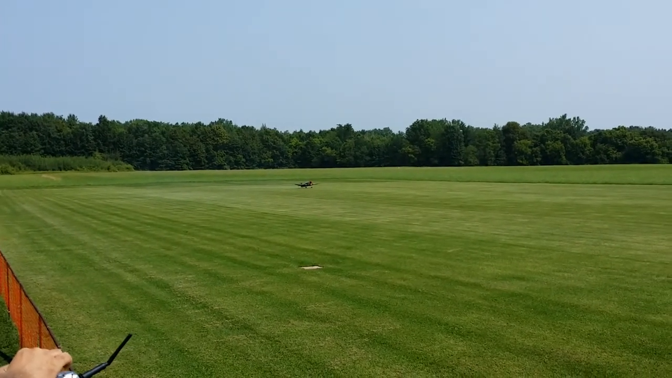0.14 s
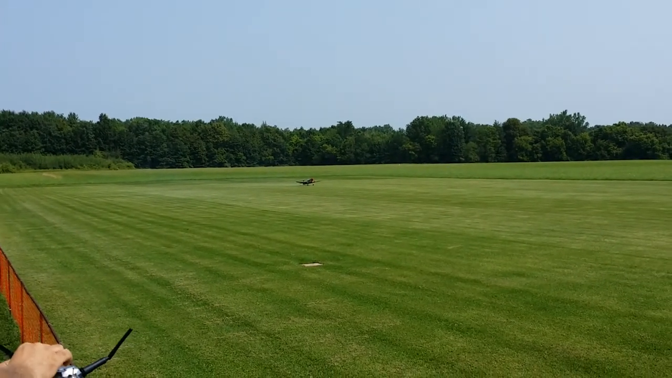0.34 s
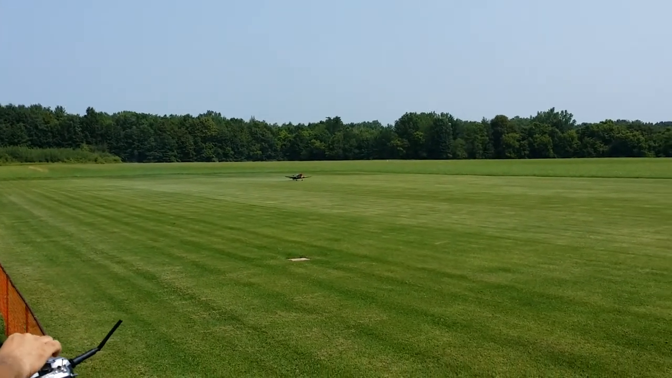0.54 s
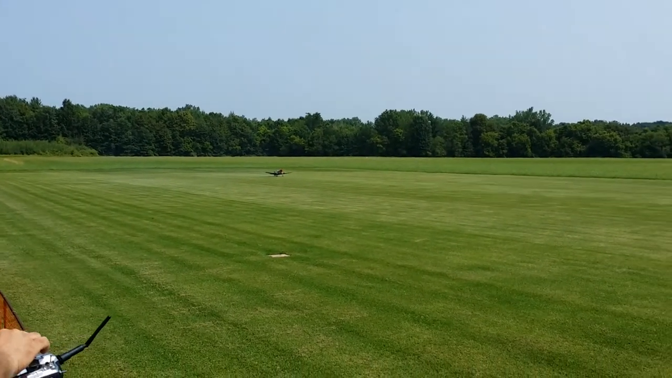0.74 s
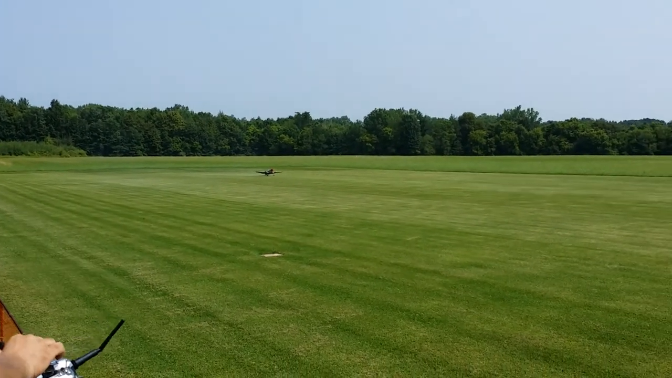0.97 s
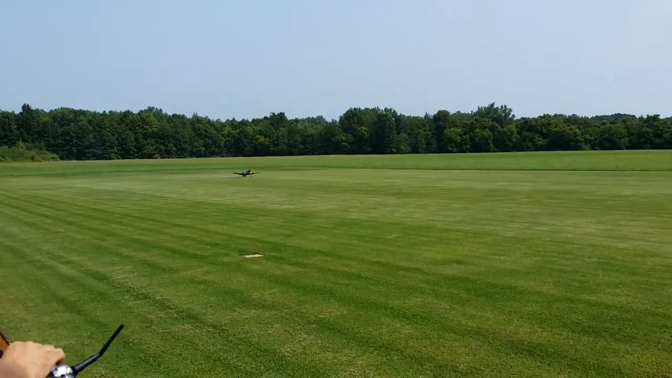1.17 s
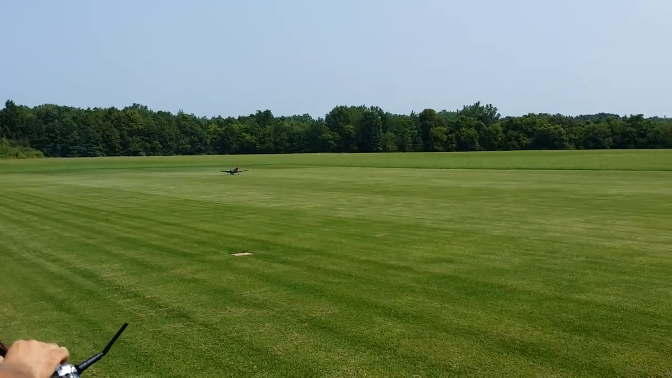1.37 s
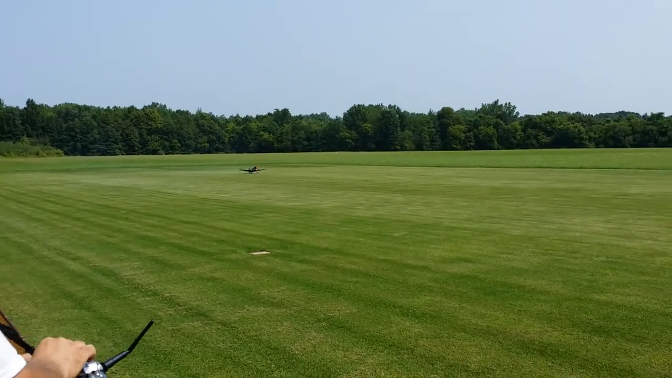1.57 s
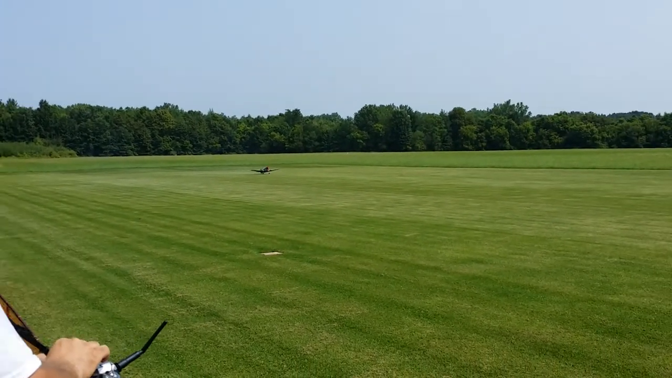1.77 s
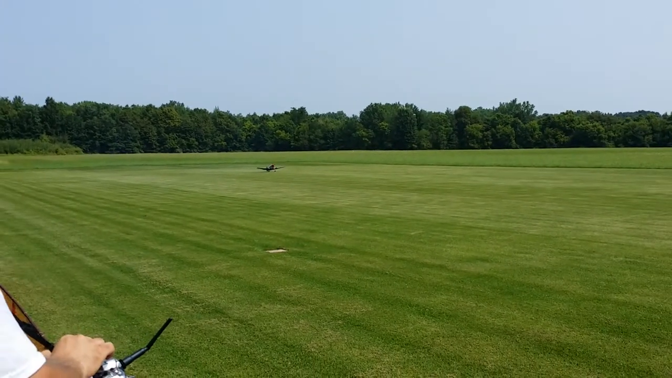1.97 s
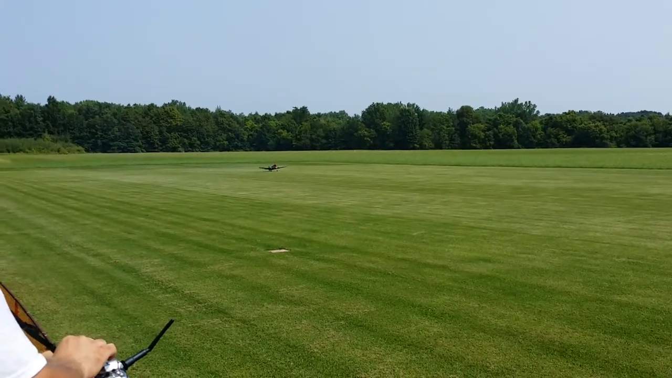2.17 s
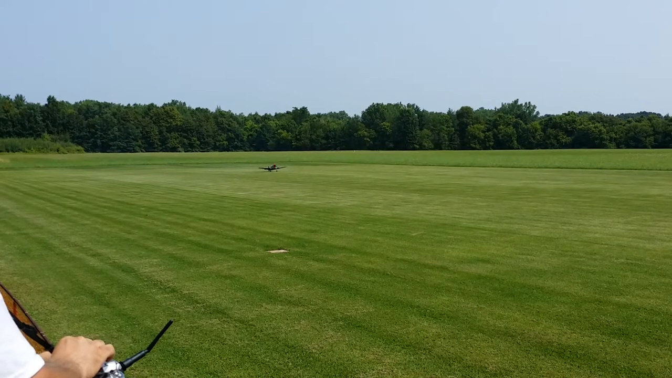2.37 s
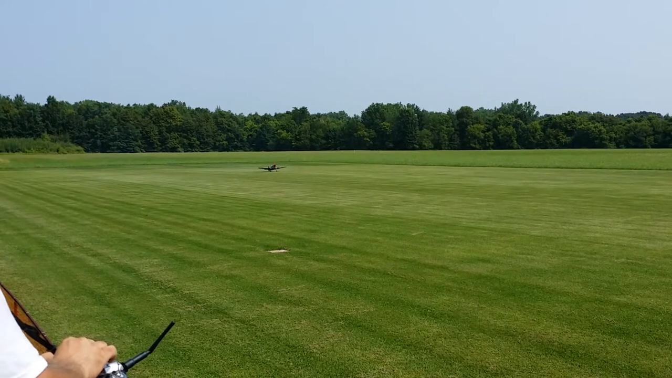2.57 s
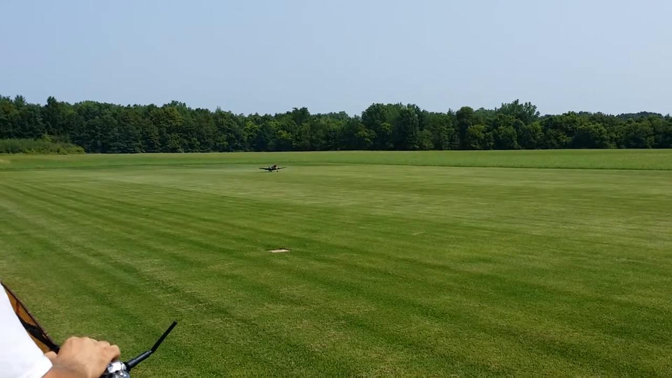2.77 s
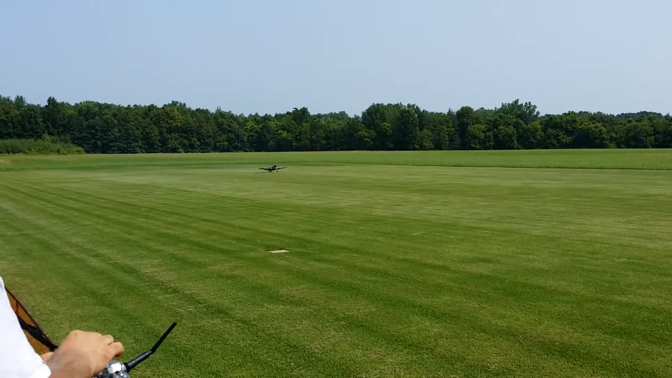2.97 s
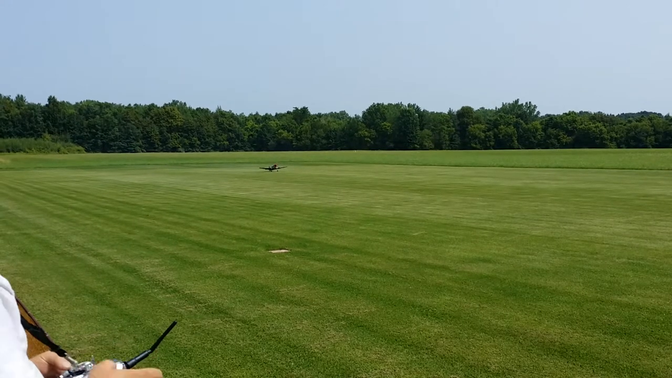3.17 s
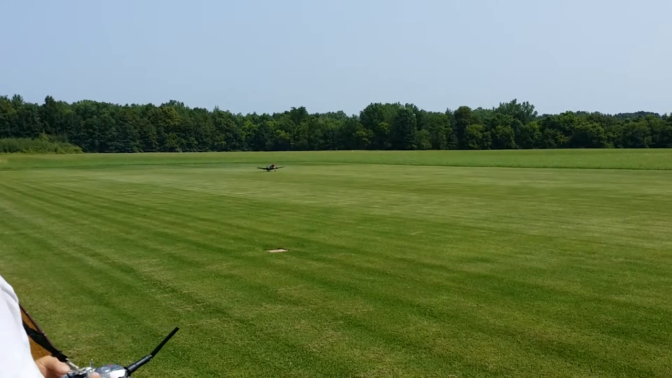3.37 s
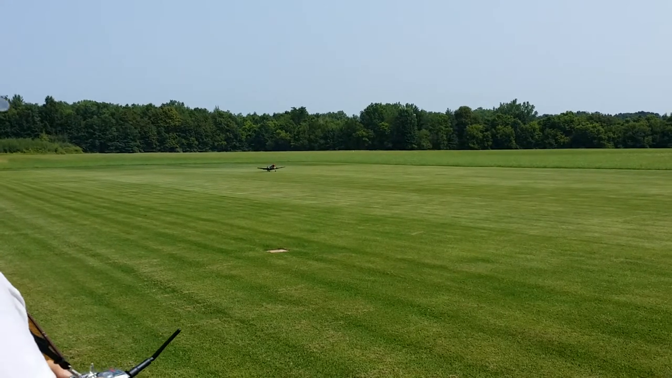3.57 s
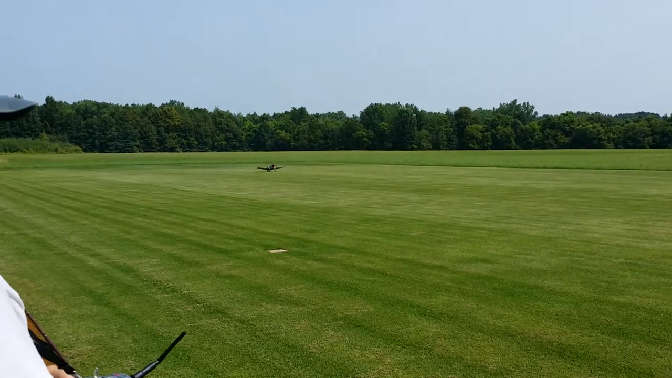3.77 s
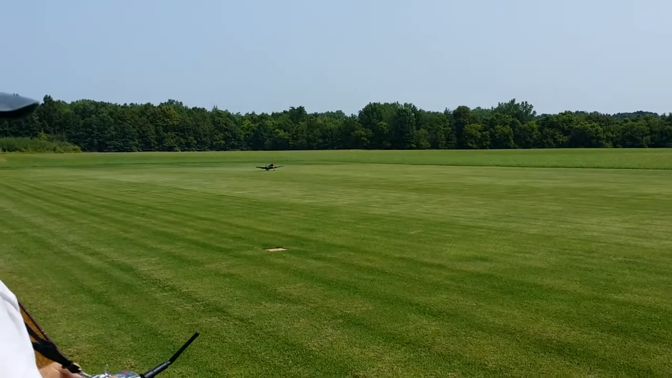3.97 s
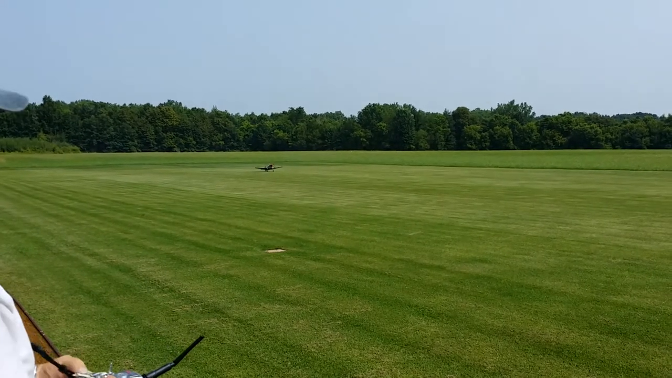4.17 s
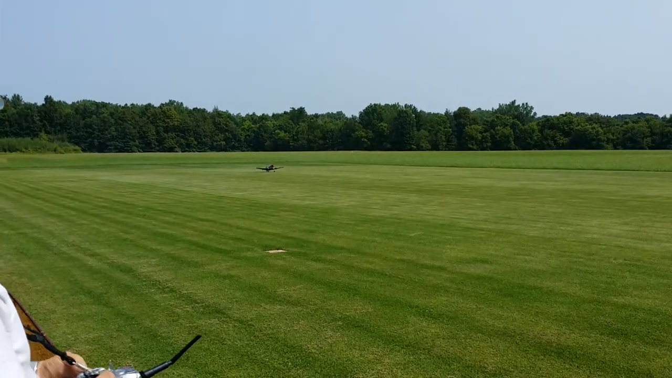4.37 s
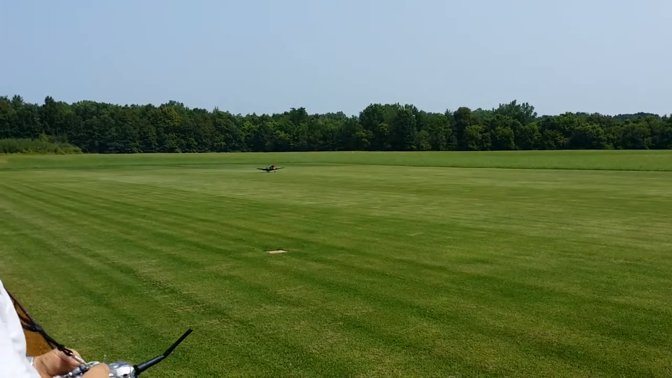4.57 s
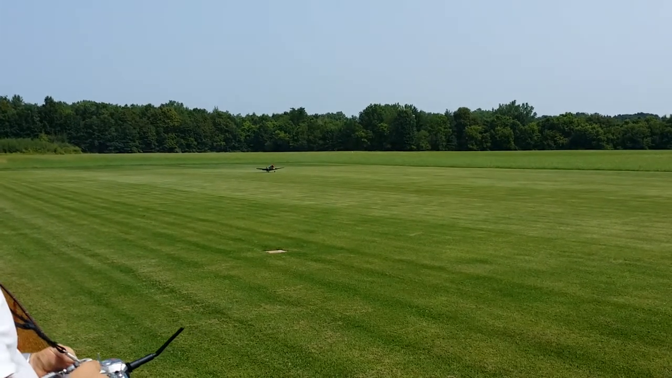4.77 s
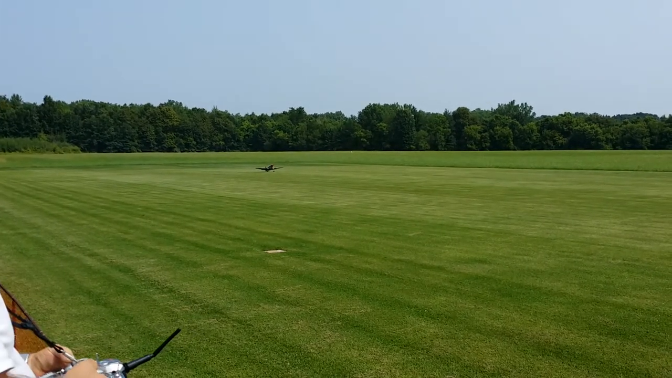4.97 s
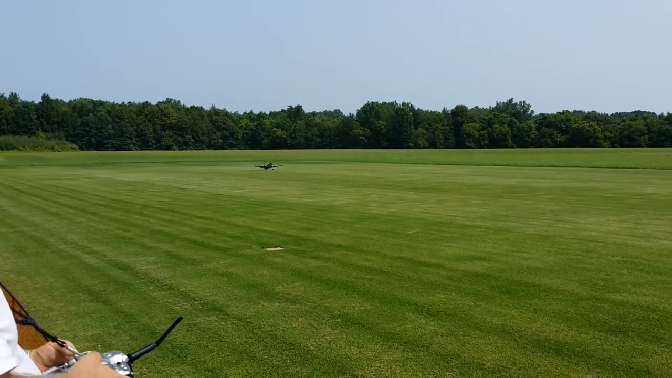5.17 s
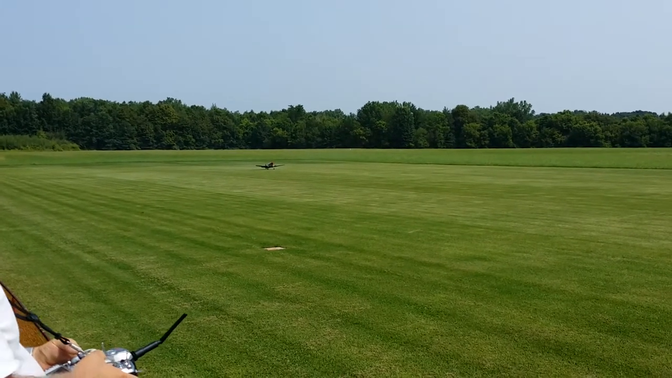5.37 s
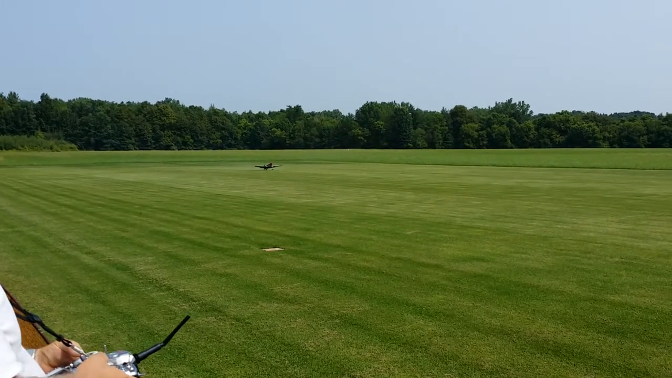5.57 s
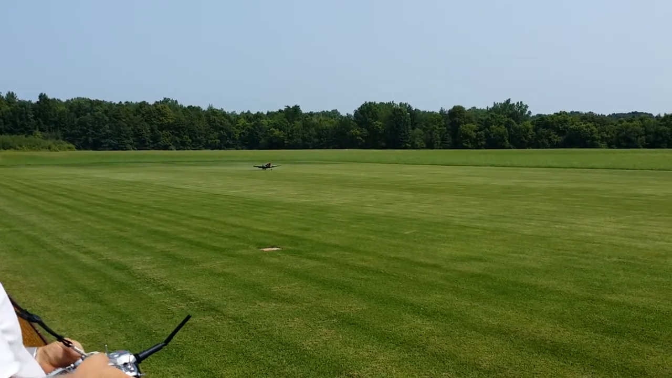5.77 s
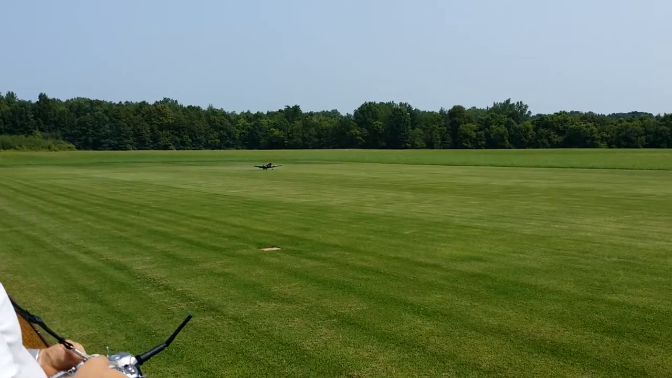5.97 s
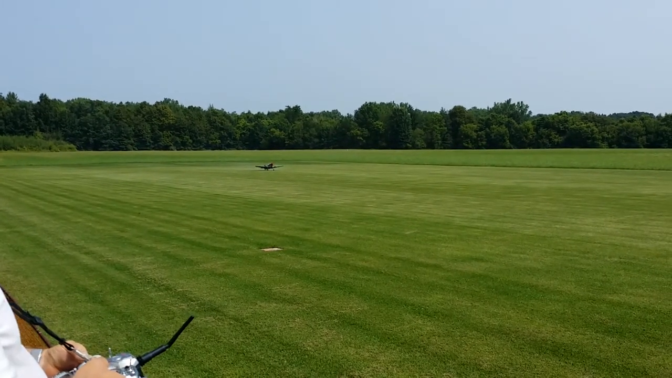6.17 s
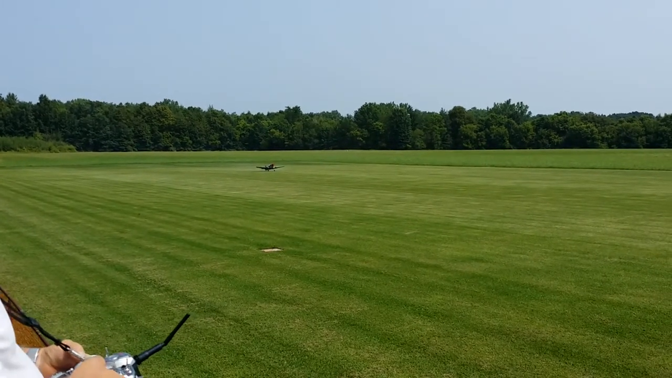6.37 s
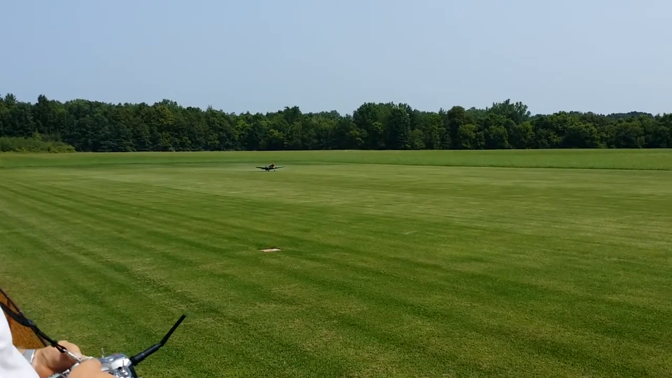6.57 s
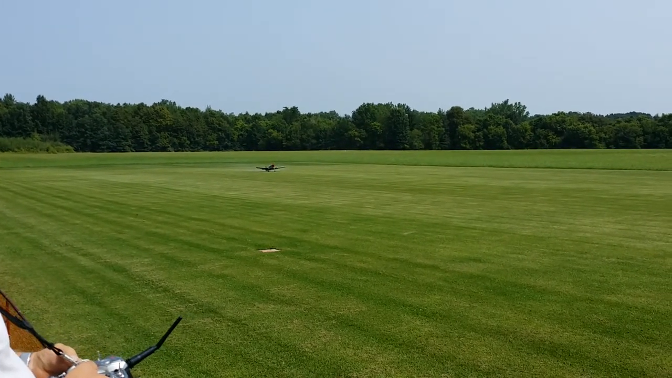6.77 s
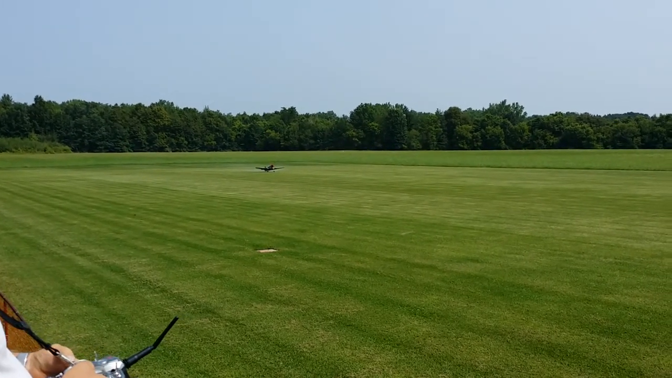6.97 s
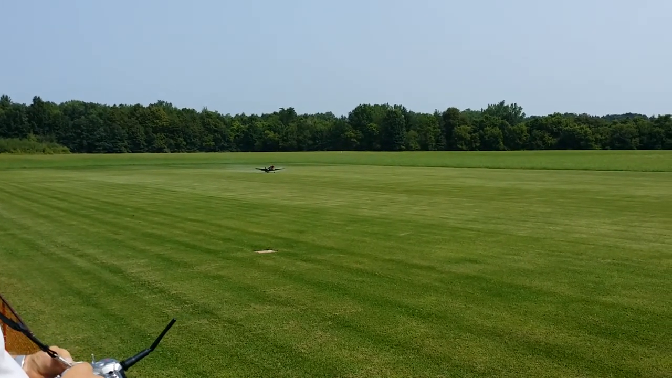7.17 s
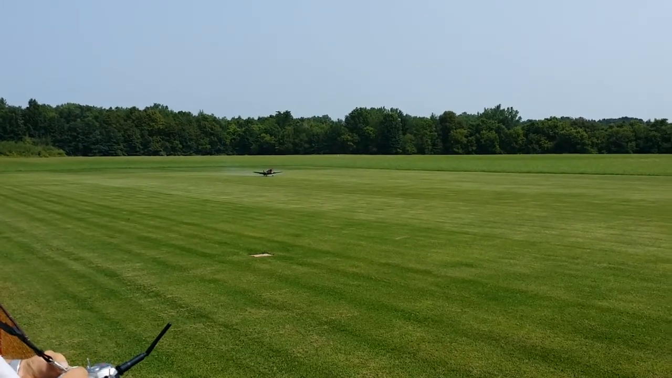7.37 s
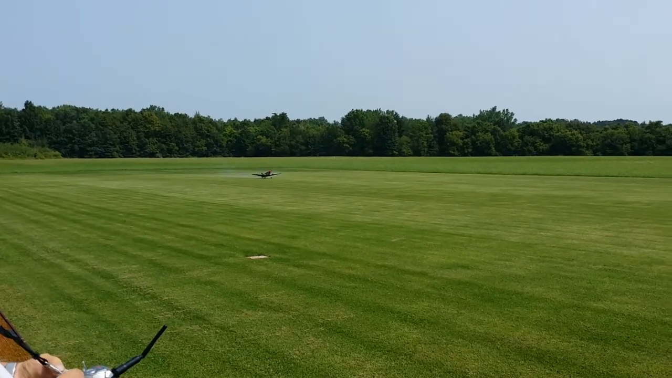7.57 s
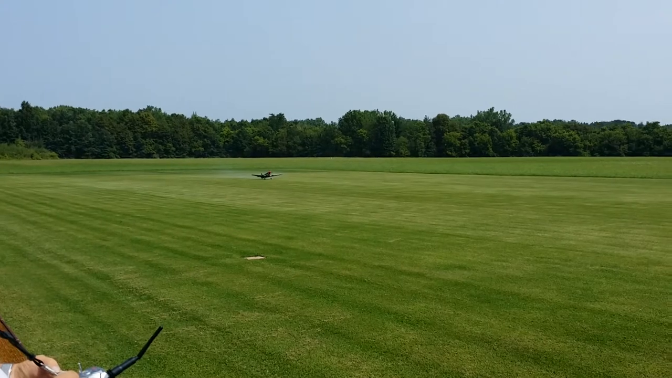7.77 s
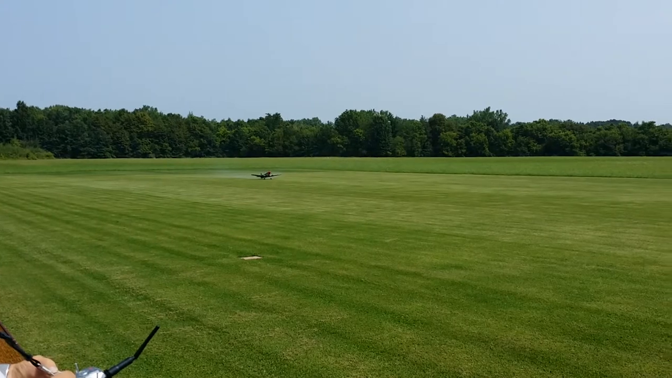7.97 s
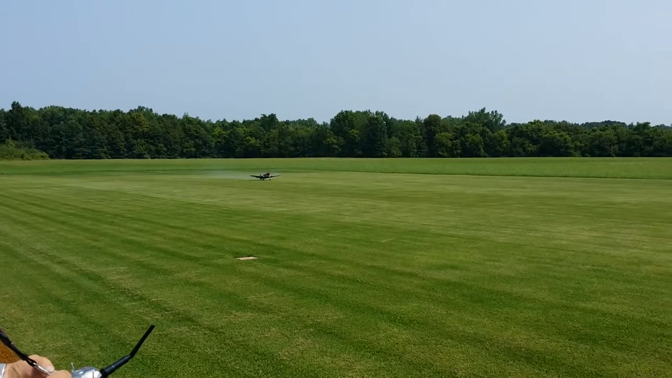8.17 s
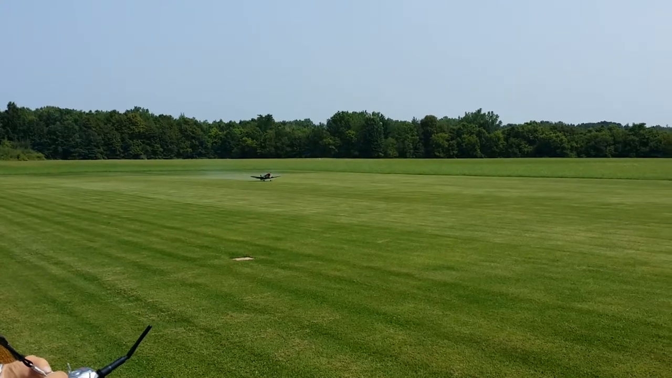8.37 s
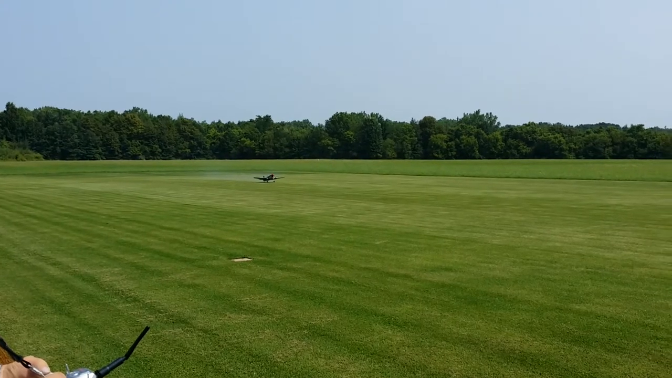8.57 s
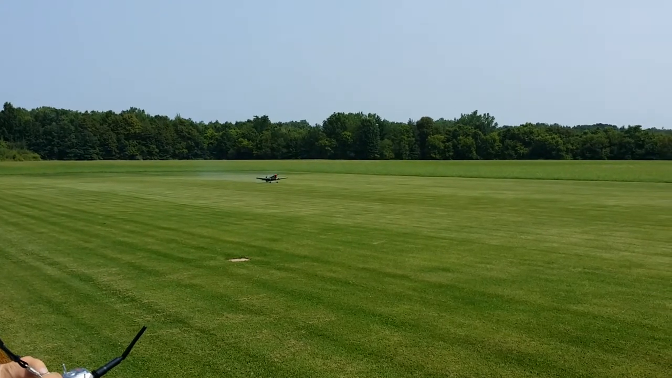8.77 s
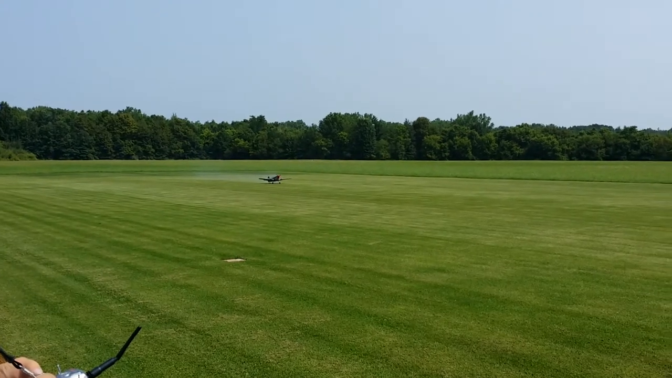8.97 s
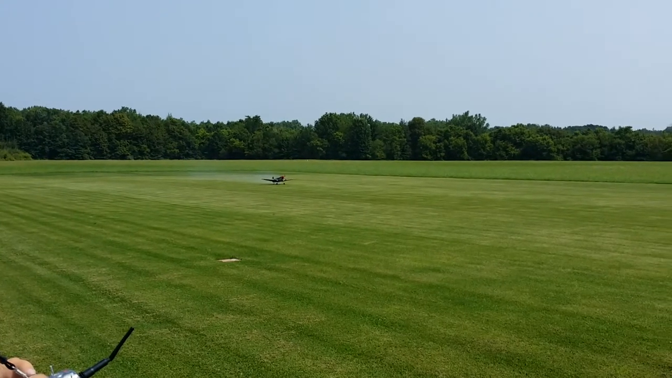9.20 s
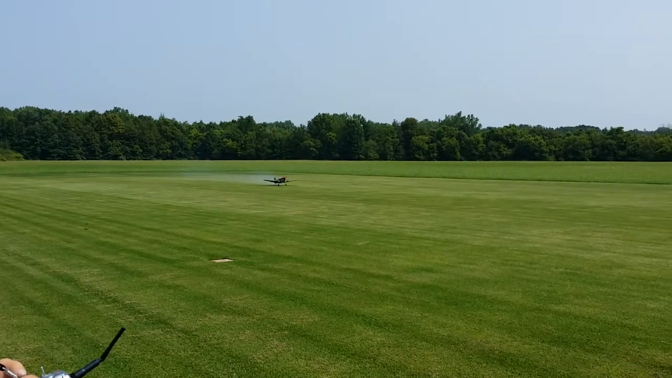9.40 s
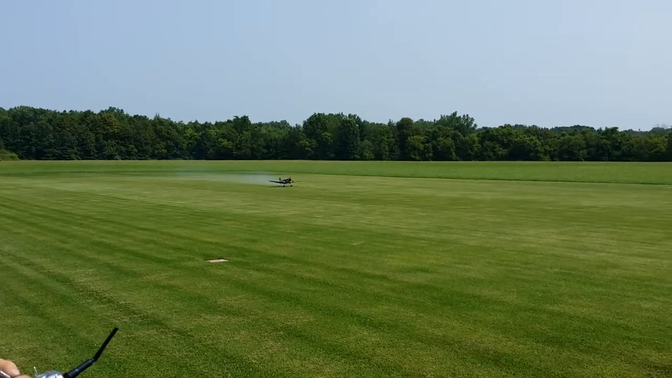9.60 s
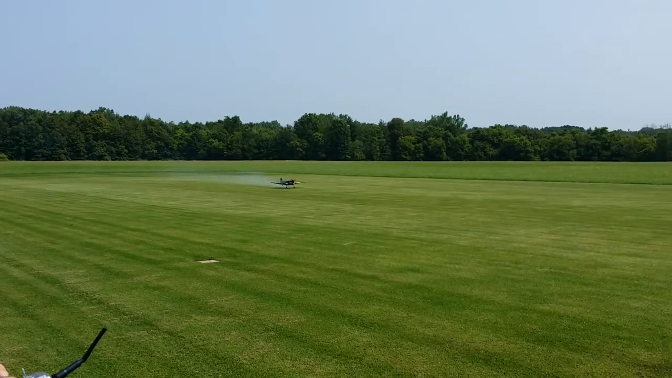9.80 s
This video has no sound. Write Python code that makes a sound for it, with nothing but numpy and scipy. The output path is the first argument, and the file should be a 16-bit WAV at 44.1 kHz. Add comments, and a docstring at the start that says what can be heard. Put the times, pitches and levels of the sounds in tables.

```python
"""A model airplane's single-cylinder four-stroke engine idles, drops lower, then opens up as the plane rolls over
a mown field. Every firing sends a puff through the muffler, built as firing orders and filtered sharp fronts,
and knocks the metal crankcase; valve gear ticks between firings. Blows and gas are noise shaped by each cycle.
The two-blade propeller hums louder with speed, in the lowest orders. Light wind and a quiet field lie underneath."""
import sys
import numpy as np
from scipy import signal
from scipy.fft import rfft, irfft, next_fast_len
from scipy.io import wavfile
from scipy.ndimage import uniform_filter1d, map_coordinates

SR = 44100
rng = np.random.default_rng(int(sys.argv[2]) if len(sys.argv) > 2 else 0)


def put_to_file(sound):
    """Save the sound as 16-bit audio at rate SR, in the file named by the first command-line argument."""
    columns = np.atleast_2d(sound).T  # one column per channel
    safe = np.clip(columns, -1, 1)
    whole_steps = np.round(safe * 32767)
    wavfile.write(sys.argv[1], SR, whole_steps.astype(np.int16))


N = 433944
TIME = np.arange(N) / SR  # s
CRUISE_RATE = 30  # firings a second, the reference for every speed law


def amp(db):
    """Decibels to gain."""
    return 10 ** (np.asarray(db) / 20)


def unit(x):
    """Scale to rms 1."""
    return x / np.sqrt(np.mean(x ** 2) + 1e-20)


def steady(x):
    """Even out slow changes of level, holding the rms near 1 over about a third of a second."""
    power = uniform_filter1d(uniform_filter1d(x ** 2, size=SR // 3), size=SR // 8)
    return x / np.sqrt(np.abs(power) + 1e-20)


def along(points, hz):
    """Read (Hz, value) points on a log frequency axis."""
    f, v = np.transpose(points)
    return np.interp(np.log(hz + 1), np.log(f), v)


def curves(rows):
    """One value per sample for each column after the time."""
    s, *cols = np.transpose(rows)
    return [np.interp(TIME, s, c) for c in cols]


def bump(when, length, height):
    """A smooth bell over time, such as a brief change of level in dB."""
    return height * np.exp(-((TIME - when) / length) ** 2)


def wobble(rate):
    """A smooth random curve, rate knots a second."""
    knots = rng.standard_normal(int(N * rate / SR) + 4)
    return map_coordinates(knots, [TIME * rate])


def octaves(rate):
    """Engine speed in octaves above cruise."""
    return np.log2(rate / CRUISE_RATE)


def filtered(x, response):
    """Multiply the spectrum of x by a response of frequency."""
    size = next_fast_len(N + SR // 4)
    hz = np.fft.rfftfreq(size, 1 / SR)
    return irfft(rfft(x, size) * response(hz), size)[..., :N]


def causal(spectrum, modes=(), size=8192):
    """Frequencies and minimum-phase response of a body with a broad spectrum and sharp resonances."""
    hz = np.fft.rfftfreq(size, 1 / SR)
    level = along(spectrum, hz)
    level = level + sum(db / (1 + (2 * (hz - f) / width) ** 2) for f, width, db in modes)
    # folding the cepstrum forward puts the ringing after the blow
    cepstrum = irfft(np.log(amp(level)))
    cepstrum[1:size // 2] *= 2
    cepstrum[size // 2 + 1:] = 0
    return hz, np.exp(rfft(cepstrum))


def pulses(times, sizes):
    """Impulses at the given times."""
    index = np.clip(np.round(times * SR).astype(int), 0, N)
    return np.bincount(index, sizes, N + 1)[:N]


def moments(cycle, offset):
    """The times at which the engine passes a point of its cycle."""
    return np.interp(np.arange(int(cycle[-1]) + 1) + offset, cycle, TIME, right=TIME[-1] + 1)


def engine():
    """The firing rate drives exhaust, propeller and clatter together."""
    # Engine speed. Each row: time in seconds, firings a second.
    firing = [(0.0, 30.63), (0.4, 30.72), (0.78, 30.81), (1.09, 31.79), (1.41, 26.45), (1.81, 23.65),
              (3.12, 24.42), (3.46, 24.2), (3.7, 24.93), (3.8, 28.33), (4.05, 29.97), (4.28, 31.73),
              (4.55, 31.52), (4.82, 31.14), (5.09, 33.57), (5.5, 33.77), (6.12, 34.28), (6.3, 35.99),
              (6.54, 36.65), (6.75, 38.95), (7.0, 40.67), (7.2, 41.3), (7.45, 41.5), (7.71, 41.8),
              (7.9, 42.7), (8.2, 43.63), (8.45, 46.22), (8.7, 48.21), (9.0, 50.91), (9.3, 52.7),
              (9.55, 55.66), (9.84, 57.7)]
    # Treble level before each layer's trim. Each row: time in seconds, gas rasp in dB, metal clatter in dB.
    treble = [(0, -48, -35), (.55, -47, -35), (1.08, -46, -33.5), (1.35, -49.5, -40), (2.1, -50.5, -39.5),
              (2.7, -48, -42.5), (3.45, -50.5, -42), (3.65, -51, -46.5), (4.3, -49, -47.5),
              (5.4, -51.5, -43), (5.95, -51, -46), (7.1, -49, -41), (8.55, -43, -30), (9, -40, -31),
              (9.4, -39, -31.5), (9.55, -37, -32), (9.68, -37, -29.5), (9.84, -34, -27)]
    rate, = curves(firing)
    cycle = np.cumsum(rate) / SR - .254  # engine cycles passed; a firing at every whole number
    rasp_db, metal_db = curves(treble)
    tones = drone(cycle, rate) + pipe_bark(cycle, rate, rasp_db) + snarl(cycle, rate) + whine(cycle)
    metal_power = crankcase_power(cycle, rate)
    gas_power = spurt_power(cycle, rate)
    noise = gas_rasp(cycle, gas_power, rasp_db)
    noise += sizzle(cycle, (metal_power + gas_power) / 2, rasp_db, metal_db)
    noise += clatter(cycle, metal_power, metal_db)
    direct, scattered = swelling(np.array([tones + noise[0], noise[1]]))
    return ports(direct + tick(), scattered)


def drone(cycle, rate, delay_s=0.00312, waver=0.11, jitter_s=0.00015, count=17, size=200):
    """The train of muffler puffs as firing orders; the lowest ones, shared with the propeller, swell with speed."""
    # Spectrum of one exhaust puff. Each row: frequency in Hz, level in dB.
    puff_spectrum = [(25, -46), (70, -34), (100, -17.5), (135, 0), (215, 2.5), (280, -1.5), (335, -13),
                     (400, -25), (900, -21.5), (3000, -115)]
    # The muffler's low resonances and the notch between them. Each row: frequency in Hz, width in Hz, dB.
    muffler = [(157, 26, 5), (183, 30, -5.5), (211, 10.6, 2.5), (331, 37, 6.5)]
    # The lowest orders against the puff spectrum. Each row: firing order, dB at cruise, dB per octave of speed.
    hum = [(2, 5.5, 10.5), (3, 1, 5), (4, -1, 4.5), (5, 1.5, 2), (6, -1, 3.5), (7, -1, 4.5)]
    # Puff level on top of the speed law. Each row: time in seconds, level in dB.
    push = [(0, 1), (3.6, 0), (3.78, 1), (4.2, 0.1), (5.3, 0.5), (6.1, 1), (6.8, -0.9), (8.1, 0),
            (8.7, 1.5), (9.84, 1)]
    # Firings that fail or nearly fail as the throttle closes.
    # Each row: time in seconds, half length in seconds, change in dB.
    misfires = [(1.25, .012, -18), (1.317, .012, -6)]
    puff_db, puff_db_per_octave = -44, 6.5  # at cruise; rise with speed
    ring_at_cruise, ring_per_octave = 0.53, 3.3  # share of the muffler's ring woken; rise with speed

    speed = octaves(rate)
    swell = {round(order): amp(db + rise_db * speed) for order, db, rise_db in hum}
    hz, dead = causal(puff_spectrum)
    hz, ringing = causal(puff_spectrum, muffler)
    rates = np.linspace(rate.min(), rate.max(), size)
    share = np.clip(ring_at_cruise + ring_per_octave * octaves(rates), 0, 1)
    turn = np.exp(2j * np.pi * (cycle - (delay_s + jitter_s * wobble(25)) * rate))
    wave, low, upper = turn, 0, 0
    for order in range(2, count):
        wave = wave * turn
        response = (1 - share) * np.interp(order * rates, hz, dead)
        response = response + share * np.interp(order * rates, hz, ringing)
        partial = -np.sqrt(2) * (wave * np.interp(rate, rates, response)).real
        if order in swell:
            low = low + swell[order] * partial
        else:
            upper = upper + partial
    push_db, = curves(push)
    misfire_db = sum(bump(*misfire) for misfire in misfires)
    burn = amp(puff_db + push_db + puff_db_per_octave * speed + misfire_db)
    # uneven burning: low and upper orders waver separately
    return burn * (low * (1 + waver * wobble(20)) + upper * (1 + waver * wobble(30)))


def bark(cycle, rate, spectrum, scatter_db=1.05, echo=0.05, delay_s=0.000997, echo_s=0.012, size=4096):
    """Each puff's sharp front scatters through pipe and airframe along the same paths, so harmonics stay clear."""
    # each front is followed by a weaker one, whose share falls away from cruise speed
    second_cycles, second_share, fade_per_octave = .222, 0.62, 1
    times = moments(cycle, 0) + delay_s
    second_times = moments(cycle, second_cycles) + delay_s
    t = np.arange(size) / SR
    paths = rfft((t == 0) + echo * np.exp(-t / echo_s) * rng.standard_normal(size))
    # the paths smear the front in time without colouring it
    smear = np.roll(irfft(paths / abs(paths)), size // 2)
    sizes = amp(scatter_db * rng.standard_normal(len(times)))
    share = np.clip(second_share - fade_per_octave * np.abs(octaves(rate)), 0, 1)
    fronts = pulses(times, sizes) + share * pulses(second_times, sizes)
    return steady(ring(signal.oaconvolve(fronts, smear, mode="same"), spectrum))


def pipe_bark(cycle, rate, rasp_db):
    """Exhaust fronts voiced by the pipe, louder with speed and partly following the rasp."""
    # The pipe's upper voice. Each row: frequency in Hz, level in dB.
    pipe = [(300, -50.5), (410, 4.5), (490, 5.5), (590, 9), (740, 3), (900, -13), (1080, -10),
            (1250, -10.5), (1450, -14), (1800, -7.5), (2600, -11), (5000, -12), (12000, -73)]
    bark_db, bark_db_per_octave, rasp_share = -52, 13.5, 0.28
    level_db = bark_db + bark_db_per_octave * octaves(rate) + rasp_share * (rasp_db - rasp_db.mean())
    return amp(level_db) * bark(cycle, rate, pipe)


def snarl(cycle, rate):
    """The hard, singing edge of the exhaust, rising steeply with speed."""
    # Colour of the edge. Each row: frequency in Hz, level in dB.
    edge = [(500, -31.5), (850, -6.5), (1050, 3), (1230, 2), (1450, -5), (1620, -5), (1850, 1), (2150, 0.5),
            (2900, -5.5), (4500, -22)]
    snarl_db, snarl_db_per_octave = -58.5, 13  # at cruise; rise with speed
    return amp(snarl_db + snarl_db_per_octave * octaves(rate)) * bark(cycle, rate, edge, 1.4, echo=0.13)


def whine(cycle, waver_db=2.5):
    """High firing orders that rise out of the rasp and sink back, unsteady in strength."""
    # Single orders that sing out for a while.
    # Each row: firing order, time in seconds, half length in seconds, dB before the bell's 0.89 peak.
    whines = [(45, 7.5, 1.0, -56), (44, 7.7, .6, -63), (53, 7.5, .7, -65), (30, 5.9, 1.0, -69),
              (29, 7.3, 1.0, -64), (25, 8.7, .5, -59), (23, 8.9, .9, -61), (34, 9.45, .35, -54),
              (12, 7.4, .7, -58), (16, 7.5, .7, -60), (22, 5.6, .6, -64), (21, 9.3, .5, -60),
              (27, 9.1, .6, -60), (14, .55, .6, -62), (15, .55, .6, -62)]
    out = np.zeros(N)
    for order, when, length, db in whines:
        level = amp(db + waver_db * wobble(14)) * bump(when, length, 0.89)
        out += level * np.sqrt(2) * np.sin(2 * np.pi * (order * cycle + rng.random()))
    return out


def blows(cycle, rate, table, knocks=(), late_db=0, scatter_db=0.7, linger_s=0.0092, linger_share=0.06):
    """Power envelope, mean near 1, of the blows in every cycle; each dies fast, then lingers."""
    t = np.arange(SR // 10) / SR
    throttle = (rate - rate.min()) / np.ptp(rate)  # 0 at the slowest speed, 1 at the fastest
    power = np.zeros(N)
    for offset, later, db, open_db, decay_s in table:
        early = offset < .2  # knocks weight the early blows, late_db the others
        times = moments(cycle - later * throttle, offset)
        level = np.interp(times, TIME, db + open_db * throttle + (0 if early else late_db))
        level += scatter_db * rng.standard_normal(len(times))
        if early:
            for s, extra_db in knocks:
                level[np.argmin(abs(times - s))] += extra_db
        shape = np.exp(-t / decay_s) + linger_share * np.exp(-t / linger_s)
        power += signal.oaconvolve(pulses(times, amp(level) ** 2), shape)[:N]
    return np.abs(power) / np.mean(power)


def crankcase_power(cycle, rate):
    """Firings knock the crankcase and valve gear ticks between them."""
    # Metal blows within one engine cycle. Each row: cycles after the firing, cycles later at full throttle,
    # relative dB at the slowest speed, dB more at full throttle, power decay in seconds.
    metal_blows = [(0, .04, 6, -5, .0026), (.07, .11, -0.5, 10.5, .0016), (.29, .05, 0.5, -3, .003),
                   (.525, .02, 1.5, -6, .0018), (.72, 0, -6, 0, .003)]
    # Firings that knock harder or softer. Each row: time in seconds, dB over an ordinary firing.
    knocks = [(.041, -4), (.171, -4), (.205, 3), (.237, -4), (.303, 6), (.402, 3.5), (.497, -2), (.53, -3),
              (.66, 2), (.692, -3), (.855, 3), (.952, 2), (1.014, -2), (1.077, 2), (1.11, 2.5), (1.31, -4),
              (1.383, -5), (1.42, 3), (1.46, 4.5), (1.536, -9), (1.575, 3), (1.696, -4), (1.737, -6),
              (1.778, -4), (1.821, 5), (1.906, 4), (1.947, -4), (1.989, -3), (2.032, 5), (2.073, -4),
              (2.116, 4.5), (2.284, 4), (2.409, 3.5), (2.533, -7), (2.575, 4.5), (2.616, 3), (2.74, -6),
              (2.823, -4), (2.946, -4), (2.988, 4), (3.03, 3), (3.11, -3), (3.151, -6), (3.192, -7),
              (3.233, 2), (3.275, 4), (3.316, -10), (3.44, 5), (3.563, -6), (3.644, -9), (3.726, 3),
              (8.525, 3), (9.269, 3), (9.381, 4), (9.419, 4.5), (9.654, 4.5)]
    return blows(cycle, rate, metal_blows, knocks)


def spurt_power(cycle, rate):
    """Exhaust gas spurts several times a cycle."""
    # Spurts within one engine cycle. Each row: cycles after the firing, cycles later at full throttle,
    # relative dB at the slowest speed, dB more at full throttle, power decay in seconds.
    spurts = [(.04, .05, 3, -3, .004), (.1, .08, 0, 3, .003), (.35, .04, -2, 2, .002)]
    # The late spurt spits harder for a while as the throttle opens.
    # The row: time in seconds, half length in seconds, change in dB.
    spit = (8, .9, 7)
    return blows(cycle, rate, spurts, late_db=bump(*spit))


def ring(x, spectrum):
    """Send x through the resonant engine and airframe."""
    # Sharp resonances of engine and airframe. Each row: frequency in Hz, width in Hz, dB over the broad spectrum.
    resonances = [(1130, 190, 4.5), (1813, 100, 3.5), (2170, 59, 3), (2546, 90, 4), (2910, 63, 2.5),
                  (4080, 95, 3.5), (5300, 72, 6), (6450, 160, 2.5), (6800, 180, 1.5), (7290, 100, -0.5),
                  (7640, 120, 6), (9430, 150, 3.5)]
    response = causal(spectrum, resonances)[1]
    return signal.oaconvolve(x, irfft(response))[:N]


def rattle(cycle, power, spectrum, wash, repeat):
    """Blows over a steady wash excite the body; part of the grain repeats every cycle. Direct and scattered."""
    firings = np.append(0, moments(cycle, 0))
    last = firings[np.searchsorted(firings, TIME, side="right") - 1]
    age = np.round((TIME - last) * SR).astype(int)  # samples since the last firing
    # repeat is a share of the grain's power
    repeated = np.sqrt(repeat) * rng.standard_normal((2, SR))[:, age]
    fresh = np.sqrt(1 - repeat) * rng.standard_normal((2, N))
    drive = np.sqrt(power + wash)
    return np.array([steady(ring(drive * grain, spectrum)) for grain in repeated + fresh])


def gas_rasp(cycle, power, rasp_db):
    """Rushing gas and propeller wash as throaty noise pulsing with the spurts."""
    # Colour of gas and wash, low and high. Each row: frequency in Hz, level in dB.
    rasp = [(100, -13.5), (350, -5), (600, -8.5), (900, -13), (1400, -9), (1750, -2), (2900, -2.5),
            (3500, -4), (6000, -33.5)]
    return amp(rasp_db + 2.5) * throaty(rattle(cycle, power, rasp, wash=2.8, repeat=0.21))


def throaty(x, depth_db=1.7, width_hz=170, life_s=.22, size=1024):
    """Narrow resonances come and go at random in the rasp, as the plane moves."""
    z = signal.stft(x, nperseg=size)[2]
    field = rng.standard_normal(z.shape[1:])
    field = uniform_filter1d(field, size=round(width_hz * size / SR), axis=0)
    field = uniform_filter1d(field, size=round(2 * life_s * SR / size), axis=1)
    gain = unit(amp(depth_db * unit(field)))
    return signal.istft(z * gain, nperseg=size)[1][:, :N]


def sizzle(cycle, power, rasp_db, metal_db):
    """A bright hiss between rasp and clatter, driven by gas and metal alike."""
    # Colour of the sizzle. Each row: frequency in Hz, level in dB.
    hiss = [(1000, -18), (2800, -19), (3600, 3), (4100, 1), (4600, 2), (5400, -2), (6300, -24),
            (10000, -34)]
    # It brightens briefly at first. The row: time in seconds, half length in seconds, change in dB.
    flare = (0.22, 0.49, 4.6)
    metal_share = 0.32
    level_db = rasp_db + metal_share * (metal_db - rasp_db) + bump(*flare)
    return amp(level_db - 1) * rattle(cycle, power, hiss, wash=0.22, repeat=0.17)


def clatter(cycle, power, metal_db):
    """The blows ring the metal of the crankcase."""
    # The crankcase's broad ring. Each row: frequency in Hz, level in dB.
    metal = [(500, -37), (3000, -19), (5800, -7), (6300, -5.5), (7400, 2.5), (8400, -2), (9400, -12),
             (10600, -15.5), (11600, -21), (14500, -25)]
    return amp(metal_db + 0.9) * rattle(cycle, power, metal, wash=0.05, repeat=0.3)


def swelling(x):
    """The engine's colour shifts as one band after another swells or sinks."""
    # Bands that change for a while.
    # Each row: time in seconds, half length in seconds, frequency in Hz, width in Hz, change in dB.
    swells = [(.15, 0.45, 8810, 1270, 6), (.3, 0.7, 3900, 740.7, 4), (.4, 0.33, 464, 50, 5),
              (.4, .7, 340, 50, -6), (.5, 0.82, 1130, 300, 1), (1.45, 0.39, 5100, 171, 11),
              (2.7, 1.2, 1090, 398, -1.5), (2.74, 2.7, 6350, 540, 10.5), (3.0, 1.6, 3740, 700, 5),
              (4.246, 0.45, 2500, 650, 3.5), (4.4, 0.52, 433, 70, 4), (7.4, 0.73, 645, 70, 2),
              (5.302, 2.6, 440, 58.8, 6), (5.505, 0.55, 990, 80, 0.5), (5.7, 0.75, 1940, 500, -6),
              (6.8, 0.23, 1080, 200, 3.5), (7.319, 1.8, 464, 78, 3), (8.15, 0.38, 1850, 130, 2),
              (5.6, 0.64, 780, 59.7, 3), (7.414, 1, 710, 90, -6), (8.5, 0.43, 191, 39.7, 4),
              (9.015, 0.96, 256, 45.3, -10), (9.14, 0.45, 2920, 148.1, 3), (9.4, 0.3, 1290, 260, 5.5),
              (9.518, 0.047, 1870, 100, 7), (9.7, 0.35, 372, 80, 6), (9.75, .2, 2400, 700, 3),
              (9.35, 0.19, 7750, 450, 3), (9.777, 0.24, 8460, 1389, 7)]
    size = next_fast_len(N + SR // 4)
    spectrum, f = rfft(x, size), np.fft.rfftfreq(size, 1 / SR)
    out = x.copy()
    for when, length, hz, width, db in swells:
        bandpass = 1j * f * width / (hz ** 2 - f ** 2 + 1j * f * width)
        band = irfft(spectrum * bandpass, size)[..., :N]
        out += (amp(bump(when, length, db)) - 1) * band
    return out


def tick():
    """One short, dry tick beside the engine, a decaying sine."""
    # The row: time in seconds, frequency in Hz, decay in seconds, level in dB.
    dry_tick = (5.832, 1750, .005, -38)
    when, hz, decay_s, db = dry_tick
    t = np.arange(SR // 20) / SR
    out = np.zeros(N)
    out[round(when * SR):][:len(t)] = amp(db) * np.exp(-t / decay_s) * np.sin(2 * np.pi * hz * t)
    return out


def ports(direct, scattered):
    """The camera body shades and delays the sound differently at its two microphone ports."""
    # Level difference. Each row: frequency in Hz, left minus right in dB.
    tilt = [(200, -0.5), (800, -2), (1250, -3), (2900, -2), (3700, 4.5), (4400, 8.5), (5400, 2.5),
            (6500, -2.5), (7200, -6), (7900, -13.5), (9700, -17.5), (13000, -6)]
    # Phase difference. Each row: frequency in Hz, radians by which left leads.
    lead = [(150, .005), (300, 0.024), (1000, 0.56), (2400, 0.85), (3400, 1.86), (4200, 2.1), (5100, 3.84),
            (5900, 2.54), (6700, 0.28), (7600, 0.61), (10000, 3.9)]
    # Likeness of the two ports. Each row: frequency in Hz, likeness from 0 to 1.
    alike = [(200, 0.59), (600, 0.21), (2000, 0.88), (7500, 0.85), (13000, 0.34)]

    def blend(hz):
        """Shares of direct and scattered sound that give the likeness."""
        angle = np.arccos(np.clip(along(alike, hz), 0, 1)) / 2
        return np.array([np.cos(angle), np.sin(angle)])

    def shade(hz):
        """Half the difference goes to each port, total power unchanged."""
        half = amp(along(tilt, hz) / 2) * np.exp(.5j * along(lead, hz))
        pair = np.array([half, 1 / half])
        return pair / np.sqrt(np.mean(abs(pair) ** 2, axis=0))

    mid, side = filtered(np.array([direct, scattered]), blend)
    return filtered(np.array([mid + side, mid - side]), shade)


def wind():
    """Light wind buffets the ports: low noise, partly separate at each, swelling in gusts."""
    # Colour of the rumble. Each row: frequency in Hz, level in dB.
    rumble_spectrum = [(15, -28), (40, -46), (65, -8.5), (100, -16.5), (200, -12), (600, -31), (3000, -70)]
    # Gusts at the microphones. Each row: time in seconds, half length in seconds, dB over the breeze.
    gusts = [(6.826, 0.07, 11), (7.96, 0.24, 14), (8.31, 0.14, 12), (9.12, 0.076, 9), (9.84, 0.22, 13)]
    breeze_db = -56  # between gusts
    wind_db = breeze_db + sum(bump(*gust) for gust in gusts)
    eddies = rng.standard_normal(N) + 0.5 * rng.standard_normal((2, N))
    rumble = unit(filtered(eddies, lambda hz: amp(along(rumble_spectrum, hz))))
    return amp(wind_db + 0.81 * wobble(4.4)) * rumble


def field_hush():
    """The quiet field: steady coloured noise, mostly common to both ports."""
    # Colour of the open-air hush. Each row: frequency in Hz, level in dB.
    hush_spectrum = [(30, -38), (90, 1.5), (300, 2), (900, -19), (3000, -20.5), (8000, -12.5),
                     (15000, -38.5)]
    noise = rng.standard_normal(N) + 0.36 * rng.standard_normal((2, N))
    return amp(-49.5) * unit(filtered(noise, lambda hz: amp(along(hush_spectrum, hz))))


def scene():
    """The airplane in the open air."""
    return engine() + wind() + field_hush()


def record(dry):
    """The camera keeps nothing above its band limit."""
    top_hz = 14750
    return filtered(dry, lambda hz: hz < top_hz)


dry = scene()
out = record(dry)
put_to_file(out)
```